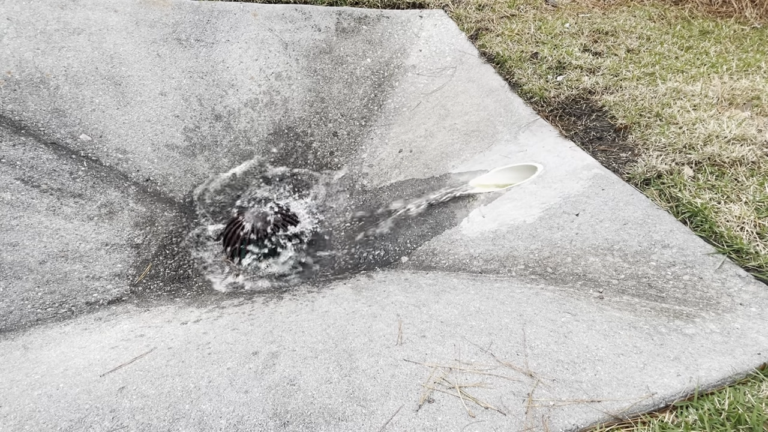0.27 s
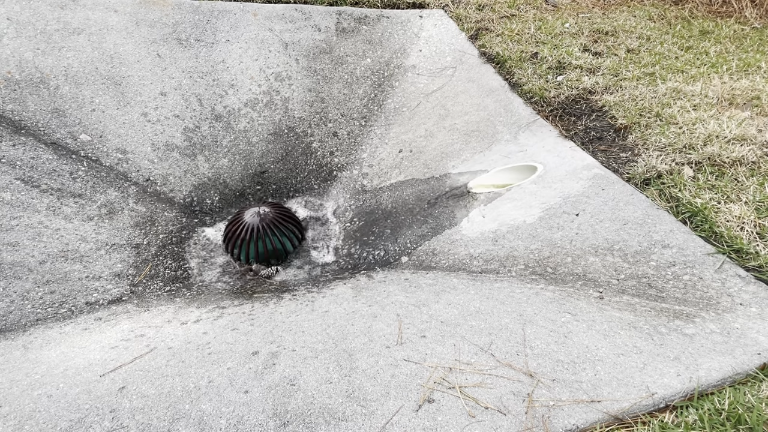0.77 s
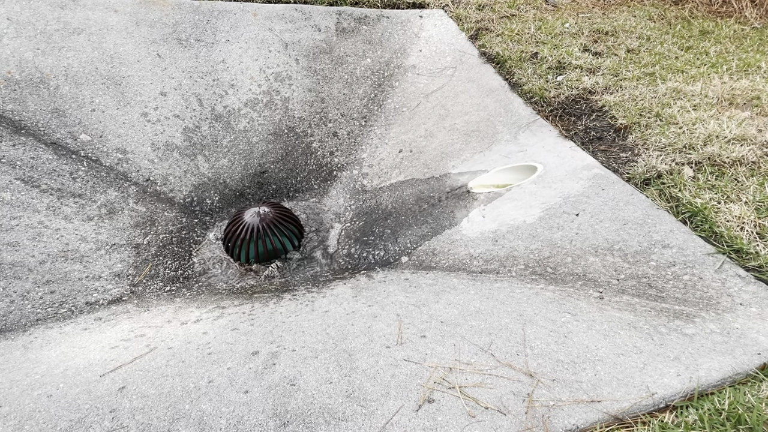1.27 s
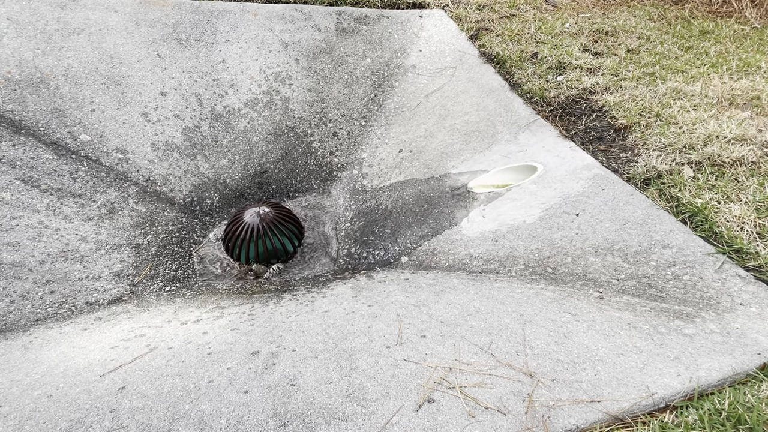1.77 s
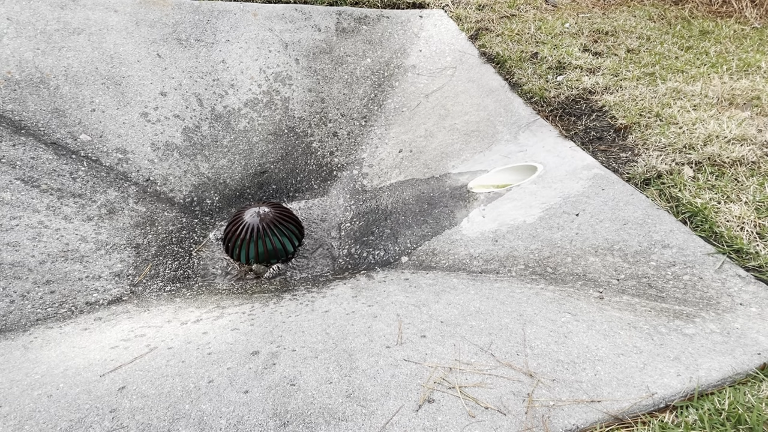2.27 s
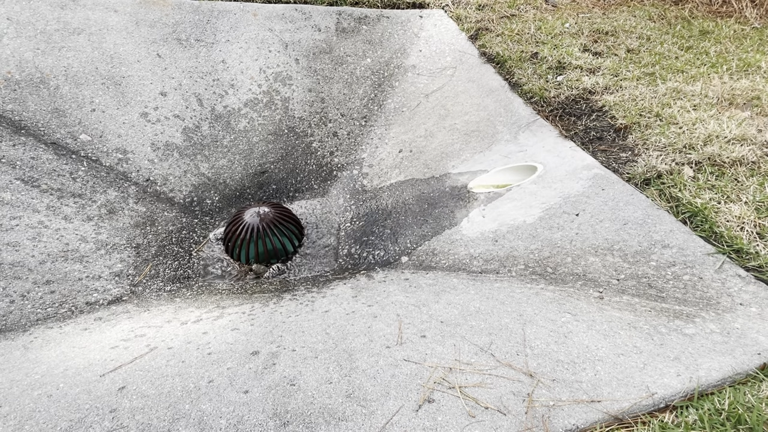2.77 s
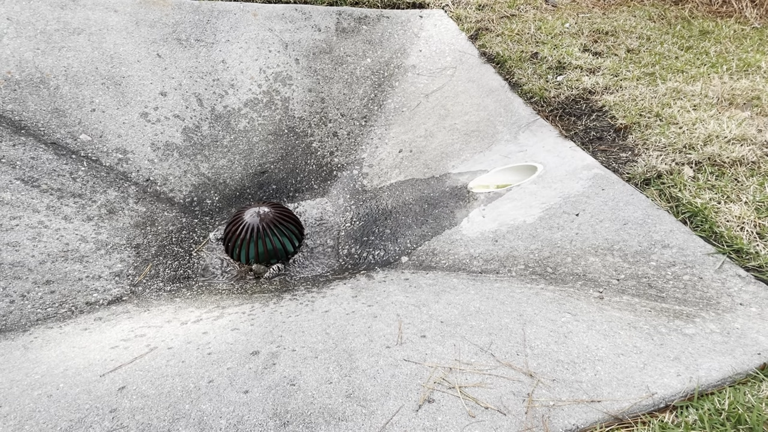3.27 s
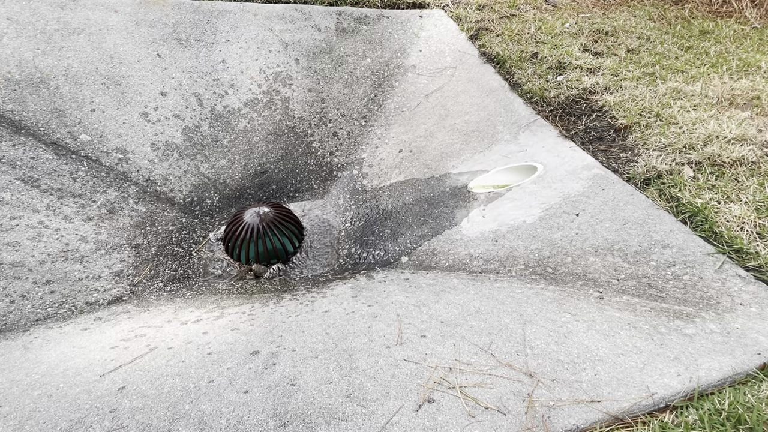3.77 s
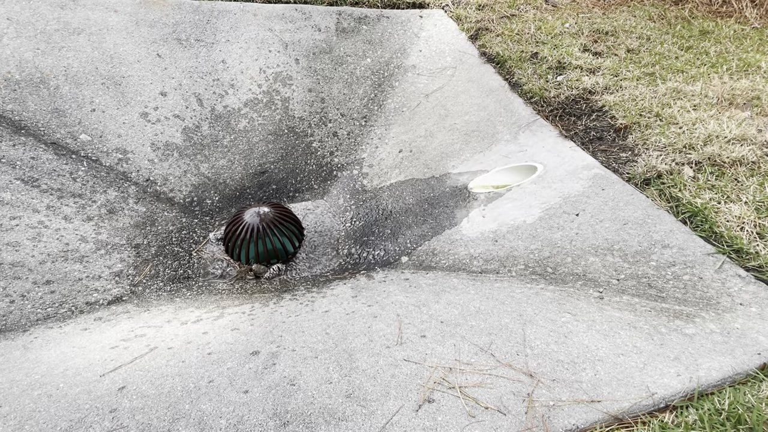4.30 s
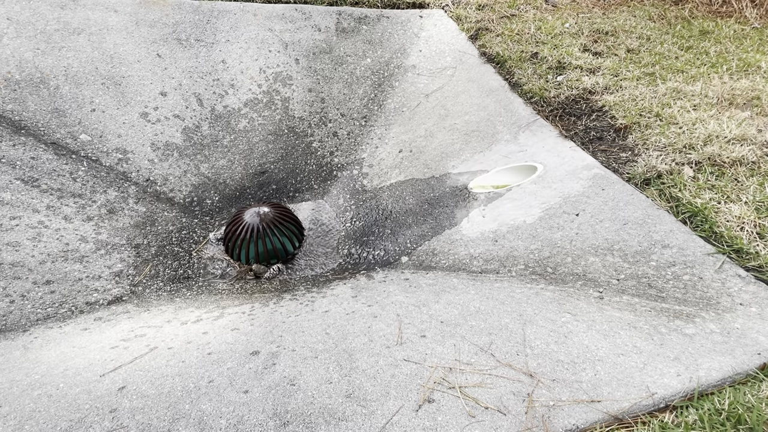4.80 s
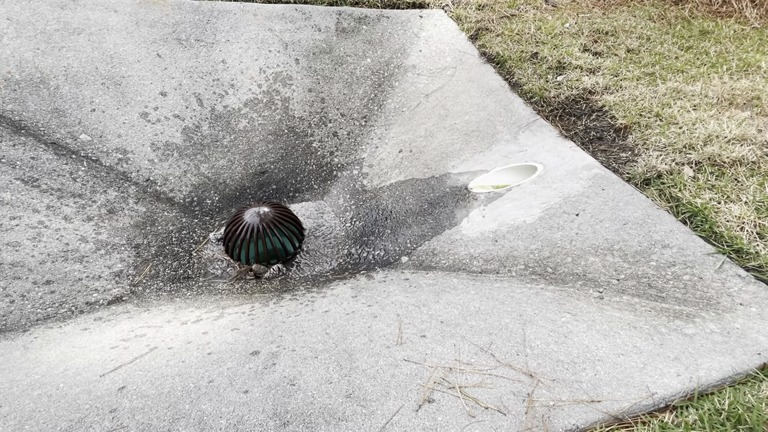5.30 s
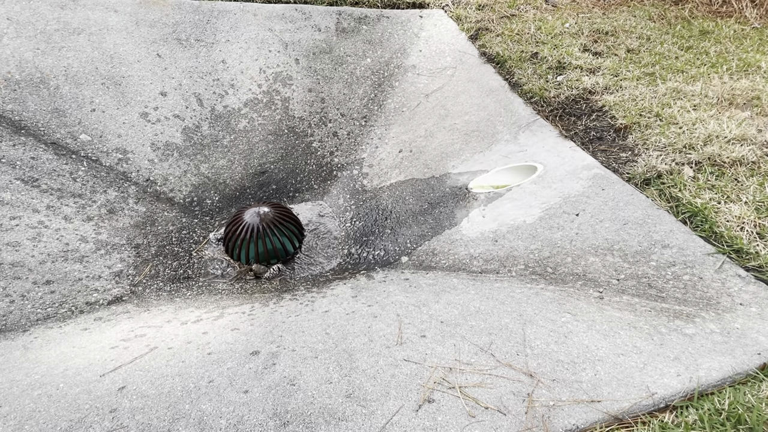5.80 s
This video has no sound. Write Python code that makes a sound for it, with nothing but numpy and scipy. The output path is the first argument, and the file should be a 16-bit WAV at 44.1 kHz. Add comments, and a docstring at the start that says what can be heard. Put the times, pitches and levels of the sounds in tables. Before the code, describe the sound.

The sound opens at full strength: a gush of water splashing on concrete and churning round a drain grate, bright spray over bubbly midrange slosh, falling steeply by 0.25 s. Rounded plops ring near 0.1 s; smaller waves slap at about 0.5, 0.85 and 1.1 s, with a low pipe thump near 0.5 and gulps around 1.0. From 1.3 to 2.5 s it thins to a soft trickle with isolated plinks and crisp splats over low gurgling. At 2.56-2.75 s the pipe belches abruptly, a tight cluster of loud hollow glugs and rumble, trailing off. Irregular gulps continue, busier at 3.5-4.2 s, with sharp splats near 4.1. From 4.6 s breeze puffs thump low on the left as the wash recedes. A faint, high bird chirp comes at 5.3 s. Sparse drips finish by 6 s over faint outdoor air. Close stereo pickup, little reverberation.

```python
"""On a concrete pad outdoors, a surge of pumped water spills into a grated drain and dwindles to a trickle.
Spray, churn and splats are shaped noise and swarms of tiny bubbles; plinks and drips are ringing bubbles.
The pipe gulps air as short swinging tones, and burbles and rumbles as patchy low noise.
Puffs of breeze are low noise, a far bird chirps once as a gliding sine, and faint outdoor noise lies below.
All of it is heard in stereo through two small microphone ports."""
import sys
import numpy as np
from scipy import signal
from scipy.fft import rfft, irfft, next_fast_len
from scipy.io import wavfile
from scipy.ndimage import uniform_filter1d

SR = 44100
rng = np.random.default_rng(int(sys.argv[2]) if len(sys.argv) > 2 else 0)


def digitize_waveform(pressure):
    """Quantize a signal to 16-bit integers and store it at the path in sys.argv[1].

    Rows of a 2-D input are taken as channels; values are limited to [-1, 1].
    """
    field = np.atleast_2d(pressure).T
    bounded = np.clip(field, -1, 1)
    quanta = np.round(bounded * 32767).astype(np.int16)
    wavfile.write(sys.argv[1], SR, quanta)


N = 266672  # length [samples]


def amp(db):
    """Turn decibels into a plain gain."""
    return 10 ** (np.asarray(db) / 20)


def unit(x):
    """Bring a signal to an rms of 1."""
    return x / np.sqrt(np.mean(x ** 2) + 1e-20)


def along(points, hz):
    """Read a (pitch, value) table at any pitch, joining its points on a log axis."""
    f, v = np.transpose(points)
    return np.interp(np.log(hz + 1), np.log(f + 1), v)


def curves(rows):
    """Draw one value per sample for each column after the time."""
    s, *cols = np.transpose(rows)
    return [np.interp(np.arange(N) / SR, s, c) for c in cols]


def filtered(x, response):
    """Multiply the spectrum of x by a response that depends on frequency."""
    m = next_fast_len(N + 8192)
    hz = np.fft.rfftfreq(m, 1 / SR)
    return irfft(rfft(x, m) * response(hz), m)[..., :N]


def coloured(x, spectrum):
    """Shape x by a table of filter gains and bring it to an rms of 1."""
    return unit(filtered(x, lambda hz: amp(along(spectrum, hz))))


def bell(centre_hz, octaves):
    """Make a smooth filter hump around one pitch."""
    return lambda hz: np.exp(-(np.log2((hz + 1) / centre_hz) / octaves) ** 2)


def patchy(patchy_db, tall=6, wide=6):
    """Two noises share patches of random gain, some bands tall and some frames wide."""
    z = signal.stft(rng.standard_normal((2, N)), nperseg=256)[2]
    field = rng.standard_normal(z.shape[1:])
    field = uniform_filter1d(field, tall, 0)
    field = uniform_filter1d(field, wide, 1)
    return signal.istft(z * amp(patchy_db * unit(field)), nperseg=256)[1][:, :N]


def spatter(count, spread_db, t60):
    """An envelope of random impacts that decay; positive spread gives a few large, negative a few faint."""
    at, size = rng.random((count, 2)).T
    sizes = amp(-2 * spread_db * np.log(1 - .995 * size))
    blows = np.bincount((at * N).astype(int), sizes, N)
    power = signal.lfilter([1], [1, -amp(-120 / (t60 * SR))], blows)
    return unit(np.sqrt(uniform_filter1d(power, size=60) + 1e-12))


def bursts(s, db, t60, tints):
    """Pairs of noise bursts rise suddenly and die away, each with its own spectrum."""
    out = np.zeros((2, N + 4096))
    t = np.arange(4096) / SR
    hz = np.fft.rfftfreq(len(t), 1 / SR)
    envelope_rise = 1 - np.exp(-t / 0.00077)
    for at, level, tint in zip(s, db, tints):
        burst = unit(irfft(rfft(rng.standard_normal((2, len(t)))) * tint(hz)))
        out[:, round(at * SR):][:, :len(t)] += amp(level - 60 * t / t60) * envelope_rise * burst
    return out[:, :N]


def bubbles(s, db, hz, t60, glide, size, rough=0, swell=1.4):
    """Fading sines swell over some cycles; row two is the same bubble by another path, at a chance phase."""
    t = np.arange(size) / SR
    s, db, hz, t60, glide = (np.asarray(v)[:, None] for v in (s, db, hz, t60, glide))
    # the pitch slides from -0.3 to +1 times the glide in octaves
    pitch = hz * 2 ** (glide * np.minimum(t / (0.38 * t60) - .3, 1))
    if rough:  # random wandering of the pitch, in octaves
        wander = uniform_filter1d(rng.standard_normal(pitch.shape), size=70)
        pitch = pitch * 2 ** (rough * unit(wander))
    phase = 2 * np.pi * np.cumsum(pitch, axis=1) / SR
    shape = amp(db - 60 * t / t60) * (1 - np.exp(-(t * hz / swell) ** 1.29))
    at = (np.round(s * SR).astype(int) + np.arange(size)).ravel()
    turns = 0, 2 * np.pi * rng.random(s.shape)
    rows = [np.bincount(at, (shape * np.sin(phase + turn)).ravel(), N + size)[:N] for turn in turns]
    return np.array(rows)


def swarm(count, centre_hz, octaves, cycles, spread_db, size, rise=0.078):
    """Bubbles at random moments and pitches fade over some cycles, rising in pitch as they near the surface."""
    draw = rng.random((count, 2))
    hz = centre_hz * 2 ** (octaves * rng.standard_normal(count))
    db = -spread_db * np.log(1 - .99 * draw[:, 1])
    return unit(bubbles(draw[:, 0] * N / SR, db, hz, cycles / hz, np.full(count, rise), size))


def swells(s, db, rise_s, fall_s):
    """Power of events that climb to a crest and die away, 20 dB in each given time (5 ms at least)."""
    late = np.arange(N) / SR - s[:, None]
    span = np.where(late < 0, np.reshape(rise_s, (-1, 1)), np.reshape(fall_s, (-1, 1)))
    return amp(2 * (db[:, None] - 20 * np.abs(late) / np.maximum(span, .005))).sum(axis=0)


def near(pair, alike, pan_db):
    """A low sound reaches both ports together, partly alike; a positive pan makes the left louder."""
    turn = np.arccos(np.clip(alike, 0, 1)) / 2
    mid, side = np.cos(turn) * pair[0], np.sin(turn) * pair[1]
    return np.array([(mid + side) * amp(pan_db / 2), (mid - side) * amp(-pan_db / 2)])


# colour of the outdoor air: (pitch [Hz], filter gain [dB])
AIR_COLOUR = [(300, -22), (600, 7.5), (1200, -22), (3000, -23.5), (12000, -34)]


def air():
    """The steady far hum and hiss of the outdoors is faint patchy noise, different at each port."""
    return amp(-71.0) * coloured(patchy(patchy_db=6.5), AIR_COLOUR)


# path of the bird's note: (time [s], pitch [Hz], level [dB])
BIRD_NOTE = [(5.286, 7350, -71), (5.295, 7970, -40.5), (5.305, 8300, -62), (5.32, 8260, -59),
             (5.34, 8200, -61)]


def bird():
    """One thin chirp, a sine that glides up and sags a little, is smeared by echoes and leans left."""
    hz, db = curves(BIRD_NOTE)
    t = np.arange(N) / SR
    sounding = (t > BIRD_NOTE[0][0]) * (t < BIRD_NOTE[-1][0])
    note = amp(db) * np.sin(2 * np.pi * np.cumsum(hz) / SR) * sounding
    echoes = rng.standard_normal((2, 4000)) * amp(-60 * t[:4000] / 0.091)
    heard = signal.fftconvolve(note[None], echoes / np.linalg.norm(echoes[0]), axes=1)[:, :N]
    return heard * amp([[1.5], [-1.5]])


# puffs of breeze, before panning: (crest time [s], level [dB], time to lose 20 dB [s])
GUSTS = [(4.63, -40, 0.04), (4.71, -45, 0.05), (4.829, -43.5, 0.1), (4.95, -44, 0.2), (5.035, -49, 0.26),
         (5.231, -51, 0.4), (5.385, -54, 0.16), (5.444, -46.5, 0.06)]
# colour of the wind's thumping: (pitch [Hz], filter gain [dB])
BUFFET_COLOUR = [(20, -46), (40, -8), (60, 5), (100, 0), (180, -8.5), (300, -19.5), (600, -78)]
GUST_RISE_S, GUST_PAN_DB = 0.084, 15.5  # time to climb 20 dB; left louder than right


def breeze():
    """Puffs of wind buffet the ports as low noise, mostly on the left."""
    s, db, fall_s = np.transpose(GUSTS)
    lumps = coloured(patchy(patchy_db=4.5, tall=2, wide=4), BUFFET_COLOUR)
    return np.sqrt(swells(s, db, GUST_RISE_S, fall_s)) * near(lumps, alike=0.46, pan_db=GUST_PAN_DB)


# the wash left in the pipe: (time [s], gurgle level [dB], rumble level [dB])
PIPE_WASH = [(0, -55, -51), (1.25, -53, -50.5), (1.7, -51.5, -49.5), (2.2, -56.5, -54),
             (2.55, -53.5, -54.5), (3.4, -55, -48.5), (3.75, -48.5, -54.5), (4.45, -55, -53),
             (4.65, -67.5, -53), (5.15, -62, -59), (6.05, -66, -64)]
# belches of air; times below 0.005 s count as 0.005 s:
# (crest time [s], gurgle level [dB], rumble level [dB], time to climb 20 dB [s], time to lose 20 dB [s])
BELCHES = [(0.053, -41, -60, 0.5, 0.85), (0.498, -39, -34, -0.05, 0.01), (.93, -42, -47, 0.26, 0.22),
           (2.575, -46, -39, -0.03, 0.25), (2.639, -42, -39, 0.1, 0.17), (2.74, -40.5, -44.5, 0.11, 0.57),
           (2.8, -43, -43, 0.2, 0.77), (3.65, -51.5, -63, 0.4, -0.37), (3.84, -43, -46.5, 0.14, 0.32),
           (5.219, -47.5, -67, -0.02, 0.15)]


def belching(column):
    """Gain of the gurgle (0) or rumble (1): the powers of the wash and the belches add up."""
    s, *db, rise_s, fall_s = np.transpose(BELCHES)
    wash_power = amp(2 * curves(PIPE_WASH)[column])
    return np.sqrt(wash_power + swells(s, db[column], rise_s, fall_s))


# colour of the rumble: (pitch [Hz], filter gain [dB])
RUMBLE_COLOUR = [(20, -40), (40, -7.5), (60, 3), (85, 0), (130, -1.5), (250, -18), (500, -65)]


def rumble():
    """The pipe's low throb is patchy noise that swells with the belches."""
    lumps = coloured(patchy(patchy_db=2.5, tall=2, wide=11), RUMBLE_COLOUR)
    return belching(column=1) * near(lumps, alike=0.94, pan_db=1.5)


# colour of the gurgle: (pitch [Hz], filter gain [dB])
GURGLE_COLOUR = [(60, -30), (130, -3), (280, 1.5), (600, 0.5), (1000, -0.5), (2000, -30)]


def pipe():
    """Small air pockets burble in the noisy wash inside the pipe."""
    pockets = swarm(count=1500, centre_hz=341.0, octaves=0.74, cycles=3.2, spread_db=1.0, size=2000)
    wash = unit(patchy(patchy_db=3.5, tall=1, wide=13))
    gurgle = belching(column=0) * coloured(3.28 * wash + pockets, GURGLE_COLOUR)
    return near(gurgle, alike=0.86, pan_db=0.0)


# air pockets in the pipe: (time [s], peak level [dB], first pitch [Hz], last pitch [Hz], length [s])
GULPS = [(0.27, -40.5, 264, 227, 0.046), (0.924, -36, 218, 138, 0.012), (1.033, -29, 594, 360, 0.0044),
         (1.038, -33, 208, 101, 0.027), (2.5628, -22.5, 920, 86, 0.015), (2.59, -23, 300, 450, 0.0053),
         (2.599, -32, 610, 402, 0.013), (2.613, -23, 740, 464, 0.0091), (2.614, -27.5, 1120, 1450, 0.012),
         (2.62, -25.5, 420, 129, 0.0099), (2.628, -23, 570, 745, 0.0078), (2.641, -22.5, 516, 224, 0.005),
         (2.644, -30, 75, 50.4, 0.052), (2.661, -29, 514, 955, 0.0107), (2.684, -31.5, 940, 1000, 0.0067),
         (2.728, -30.5, 327, 149, 0.01), (2.733, -33, 800, 600, 0.005), (2.777, -36.5, 89, 55, 0.12),
         (2.93, -40, 95, 65, 0.086), (3.151, -31.5, 410, 125, 0.015), (3.359, -36, 236, 265, 0.014),
         (3.466, -39, 298, 168, 0.01), (3.55, -30.5, 455, 606, 0.011), (3.635, -35.5, 330, 230, 0.011),
         (3.646, -41.5, 234, 340, 0.046), (3.684, -34, 298, 382, 0.01), (3.8212, -28, 397, 256, 0.013),
         (3.841, -33.5, 503, 423, 0.01), (3.87, -39, 330, 400, 0.0074), (3.91, -40, 330, 270, 0.0035),
         (3.975, -36, 330, 280, 0.0117), (3.993, -30, 460, 280, 0.0093), (4.192, -31.5, 605, 360, 0.0058),
         (4.357, -41.5, 593, 450, 0.019), (4.369, -43, 480, 367, 0.017), (5.249, -47, 400, 250, 0.0066),
         (5.38, -44, 546, 610, 0.01)]
GULP_CENTRED_DB, GULP_PAN_PER_DB = -41, 0.01  # this size sits in the middle; larger lean slightly left
GULP_SPLASH_DB, GULP_SPLASH_HZ, GULP_SPLASH_T60_S = -13.5, 1180, 0.034  # splash level against its pocket


def gulps():
    """Each large air pocket swings a few times, its period stretching or shrinking, beside a noisy splash."""
    out = np.zeros((2, N))
    for s, db, first_hz, last_hz, length in GULPS:
        pan_db = GULP_PAN_PER_DB * (db - GULP_CENTRED_DB)
        u = np.linspace(0, 1, int(length * SR))
        period = (1 - u) / first_hz + u / last_hz
        swing = np.sin(np.pi * u ** 0.38) * np.sin(2 * np.pi * np.cumsum(1 / period) / SR)
        out[:, round(s * SR):][:, :len(u)] += amp(db + np.array([[pan_db], [-pan_db]]) / 2) * swing
    s, db = np.transpose(GULPS)[:2]
    tints = [bell(GULP_SPLASH_HZ, octaves=0.83)] * len(s)
    splashes = bursts(s, db + GULP_SPLASH_DB, GULP_SPLASH_T60_S, tints)
    return out + near(splashes, alike=0.8, pan_db=-2.5)


PIPE_LAG_S = 0.00023  # the pipe is nearer the right port


def from_right(pair):
    """The left port hears the pipe a little later than the right."""
    return filtered(pair, lambda hz: np.exp(np.outer([-1j, 1j], np.pi * hz * PIPE_LAG_S)))


# drips flung off while the jet runs, back as the pad empties: (time [s], level [dB])
DRIPS = [(0, -44.5), (.3, -55.5), (.5, -49), (.9, -61), (1.6, -89), (4.75, -83), (4.9, -60.5),
         (5.05, -65.5), (5.3, -66.5), (5.66, -79), (5.71, -62.5), (6.05, -74.5)]


def drips():
    """Small drips round the grate ring as a swarm of bubbles, spread wide and a little louder on the right."""
    plips = swarm(count=3500, centre_hz=2740, octaves=0.395, cycles=14.4, spread_db=3.5, size=900, rise=0.2)
    return amp(curves(DRIPS)[0]) * near(plips, alike=0.09, pan_db=-4.0)


# drops into the sheet of water:
# (time [s], bubble level [dB], bubble pitch [Hz], glide [octaves], slap level against the bubble [dB])
PLINKS = [(.023, -40, 1170, 0.35, -8), (.05, -39, 875, -0.18, -10.5), (.087, -29.5, 1610, 0.068, -6),
          (.113, -22.5, 833, 0.35, -4), (.127, -23.5, 1597, 0.22, -11), (.445, -31, 840, 0.049, -5),
          (.506, -34, 2430, -0.53, 1), (.675, -33.5, 2200, -0.0036, -4), (.413, -33.5, 1035, 0.24, -13),
          (.485, -33, 597, 0.00089, -9), (.848, -28.5, 1690, 0.49, -6), (.864, -36.5, 674, -0.38, 2),
          (.899, -29, 986, -0.11, -21), (1.39, -30.5, 1370, 0.003, -19), (1.746, -35.5, 1590, 0.22, -4),
          (1.876, -42, 1025, -0.0043, -8), (2.135, -39, 1870, 0.23, -20.5), (2.541, -31, 1460, 0.03, -9),
          (2.754, -35, 835, -0.26, -3), (2.774, -40, 1020, 0.05, -12), (3.002, -36, 1002, 0.83, -7.5),
          (3.207, -36.5, 1554, -0.01, -6.5), (3.329, -45, 845, 0.33, -2), (3.795, -38, 980, 0.39, 0),
          (3.886, -38, 1400, .15, -1), (4.142, -36.5, 1970, 0.03, -8), (4.274, -46.5, 1020, 0.49, 1),
          (4.354, -41, 1120, 0.13, -4.5), (4.489, -44.5, 2000, -0.22, -2), (4.548, -44, 1540, -0.52, -12),
          (4.682, -51.5, 1290, .15, 5.5), (4.709, -32.5, 1280, 0.03, -17), (4.81, -45, 1960, 0.11, -24),
          (4.954, -39, 1710, 0.11, -4.5), (5.079, -41, 1910, 0.46, 0), (5.164, -43.5, 744, -0.14, -3),
          (5.208, -38, 552, -0.54, -13), (5.282, -52, 860, -0.016, 2), (5.304, -45, 1270, .15, 4),
          (5.388, -35.5, 580, -0.52, -9), (5.418, -46, 1610, 0.69, 1.5), (5.435, -44, 1400, -0.02, -5),
          (5.491, -40.5, 1580, -0.55, -26), (5.53, -46.5, 1720, 0.33, -6), (5.697, -50.5, 2530, 0.3, 1),
          (5.737, -37.5, 1540, 0.34, -27), (5.82, -38.5, 1180, 0.8, -6), (5.844, -47, 666, -0.25, 3),
          (5.857, -43.5, 1090, -0.33, -1)]
PLINK_T60_S, SLAP_T60_S = 0.045, 0.048  # time to fade 60 dB


def plinks():
    """A drop slaps the water over a wide band and leaves an unsteady bubble ringing."""
    s, db, pitch_hz, glide, slap_db = np.transpose(PLINKS)
    ring_s = np.full(len(s), PLINK_T60_S)
    ring = bubbles(s, db, pitch_hz, ring_s, glide, size=4000, rough=0.049, swell=2.2)
    slaps = bursts(s, db + slap_db, SLAP_T60_S, [bell(hz, octaves=0.79) for hz in pitch_hz])
    return ring + slaps


# drops on concrete: (time [s], rms level before fading [dB], colour [Hz])
SPLATS = [(0.058, -39, 5860), (0.401, -28.5, 11500), (0.424, -36.5, 6450), (0.459, -31.5, 9350),
          (0.541, -31, 9900), (0.571, -24.5, 2650), (1.0266, -32, 4800), (1.175, -35.5, 4200),
          (1.389, -30, 3900), (1.551, -34.5, 6740), (1.706, -38, 4660), (2.306, -34.5, 8000),
          (2.566, -39, 8830), (2.611, -41.5, 7060), (2.7293, -34, 5700), (2.833, -41, 6200),
          (2.857, -43, 5900), (2.9467, -34.5, 8550), (2.957, -41, 6000), (3.014, -43, 6250),
          (3.218, -45, 7300), (3.245, -44, 6000), (3.262, -45, 4800), (3.4633, -40.5, 4900),
          (3.609, -39.5, 8100), (3.7256, -39.5, 6440), (3.935, -39.5, 4930), (4.0805, -39, 9300),
          (4.102, -33, 7650), (4.14, -38, 9600), (4.1814, -32.5, 6560), (4.251, -42, 7300),
          (4.334, -35.5, 11100), (4.584, -39.5, 9000), (4.6735, -41.5, 8960), (4.768, -46, 5640),
          (4.8434, -36.5, 9200), (4.909, -44, 6240), (5.133, -40.5, 7860), (5.1634, -43.5, 5630),
          (5.387, -40, 7650), (5.5767, -42.5, 8400), (5.599, -46, 3230), (5.697, -46, 4340),
          (5.76, -47, 4450), (5.855, -49, 6500)]
SPLAT_T60_S = 0.027  # time to fade 60 dB


def splats():
    """Each large drop is a burst of noise, spray-coloured and lifted around its own pitch."""
    s, db, colour_hz = np.transpose(SPLATS)

    def tint(centre_hz):
        lift = bell(centre_hz, octaves=0.28)
        return lambda hz: amp(along(SPRAY_COLOUR, hz)) * (0.23 + lift(hz))

    return bursts(s, db, SPLAT_T60_S, map(tint, colour_hz))


# the sheet of water draining away: (time [s], spray level [dB], churn level [dB])
FLOW = [(0, -35.5, -30), (.13, -37.5, -35.5), (.25, -44.5, -43), (.75, -45.5, -46.5), (1.3, -46.5, -49.5),
        (1.9, -49.5, -51), (2.5, -50, -52.5), (3.4, -50, -53.5), (4.05, -51, -55), (4.65, -53, -61),
        (5.45, -57.5, -62), (5.85, -59, -65.5), (6.05, -62.5, -63)]
# waves running over the pad: (crest time [s], spray level [dB], churn level [dB])
SURGES = [(.36, -48.5, -70), (.48, -49, -37.5), (.6, -48, -56), (0.849, -50, -42), (1, -48, -48),
          (1.12, -43.5, -56), (1.47, -54, -45.5), (2.63, -52, -43), (2.755, -54, -51), (4.15, -53.5, -64),
          (5.29, -53, -57.5)]
SURGE_RISE_S, SURGE_FALL_S = 0.08, 0.26  # time to climb and to lose 20 dB


def flow(column):
    """Gain of the spray (0) or churn (1): the powers of the draining sheet and its waves add up."""
    s, *db = np.transpose(SURGES)
    sheet_power = amp(2 * curves(FLOW)[column])
    return np.sqrt(sheet_power + swells(s, db[column], SURGE_RISE_S, SURGE_FALL_S))


# colour of the churn: (pitch [Hz], filter gain [dB])
CHURN_COLOUR = [(150, -15), (400, -5), (800, -6), (1600, 3), (2100, 1), (2500, -13), (3000, -27),
                (5000, -15.5)]


def churn():
    """The sheet of water slaps the grate as spattered noise and tears off small bubbles."""
    spattering = 1.0 + .5 * spatter(count=1500, spread_db=7.5, t60=0.081)
    slaps = unit(patchy(patchy_db=4.0, tall=2, wide=4) * spattering)
    froth = swarm(count=5000, centre_hz=1199, octaves=0.652, cycles=15.5, spread_db=3.0, size=900)
    return flow(column=1) * coloured(slaps + 0.53 * froth, CHURN_COLOUR)


# colour of the spray, shared with the splats: (pitch [Hz], filter gain [dB])
SPRAY_COLOUR = [(900, -30), (2000, -4.5), (2600, -3.5), (3200, -3), (4200, -7), (5400, -4.5), (7200, -6.5),
                (8100, -10.5), (9300, -4.5), (10100, 0), (10700, -2.5), (11400, -9.5), (12350, -20),
                (12800, -34)]


def spray():
    """Fine drops spatter as noise over a fizz of tiny bubbles, some of which ring longer."""
    spattering = 0.77 + 0.63 * spatter(count=500, spread_db=-4.0, t60=0.094)
    drops = unit(patchy(patchy_db=2.5, tall=4, wide=6) * spattering)
    fizz = swarm(count=4000, centre_hz=6460, octaves=0.517, cycles=140, spread_db=6.0, size=300)
    tinkle = swarm(count=700, centre_hz=4960, octaves=0.76, cycles=225, spread_db=-4.5, size=1800, rise=0.23)
    return flow(column=0) * coloured(drops + 0.15 * fizz + 0.067 * tinkle, SPRAY_COLOUR)


# how far the left port leads, about: (pitch [Hz], phase lead [radians])
PORT_LEAD = [(100, .1), (700, 1.15), (1450, 1.75), (2150, 1.9), (2600, 2.45), (2950, 3.05), (3400, 3.3),
             (4500, 5.4), (5000, 4.9), (5400, 3.4), (5800, 6.3), (6600, 6.9), (7200, 6.1), (7600, 6.4),
             (8200, 8.7), (8450, 8), (8700, 6.1), (9000, 5.8), (9700, 3.25), (10250, 3.14), (10800, 2.3),
             (11750, 0)]
# how alike the two ports sound, about: (pitch [Hz], likeness [0 to 1])
PORT_LIKENESS = [(100, .9), (1000, .75), (2000, .85), (2900, .96), (3500, .83), (4150, .7), (4700, .4),
                 (5600, .45), (6300, .82), (7500, .9), (8000, .35), (9000, .85), (9700, .96), (10200, .995),
                 (10700, .95), (11300, .87), (11900, .95)]
# how much louder the left port is, about: (pitch [Hz], left over right [dB])
PORT_LEAN = [(300, 12), (800, 8.5), (1400, 3.5), (2300, -2.5), (3500, 3.5), (5400, 1.5), (7300, 5),
             (8500, -11), (9500, 4.5), (10500, 1)]


def ports(pair):
    """Direct and scattered paths reach the two ports with a lead, a tilt and a likeness that vary with pitch."""
    def heard(side):
        def response(hz):
            turn = np.arccos(np.clip(along(PORT_LIKENESS, hz), 0, 1)) / 2
            port = amp(side * along(PORT_LEAN, hz) / 2) * np.exp(side * .5j * along(PORT_LEAD, hz))
            return port * [np.cos(turn), side * np.sin(turn)]
        return filtered(pair, response).sum(axis=0)
    return np.array([heard(1.0), heard(-1.03)])  # left, right


def scene():
    """Add the water on the pad, the pipe and the outdoors."""
    pad = ports(spray() + splats() + churn() + plinks()) + drips()
    drain = from_right(pipe() + gulps()) + rumble()
    return pad + drain + breeze() + bird() + air()


def record(dry):
    """The phone keeps nothing from 12760 Hz upwards."""
    return filtered(dry, lambda hz: hz < 12760)


dry = scene()
out = record(dry)
digitize_waveform(out)
```